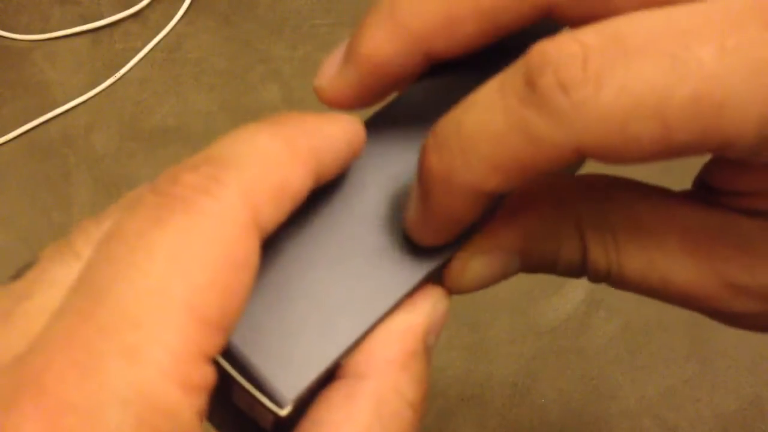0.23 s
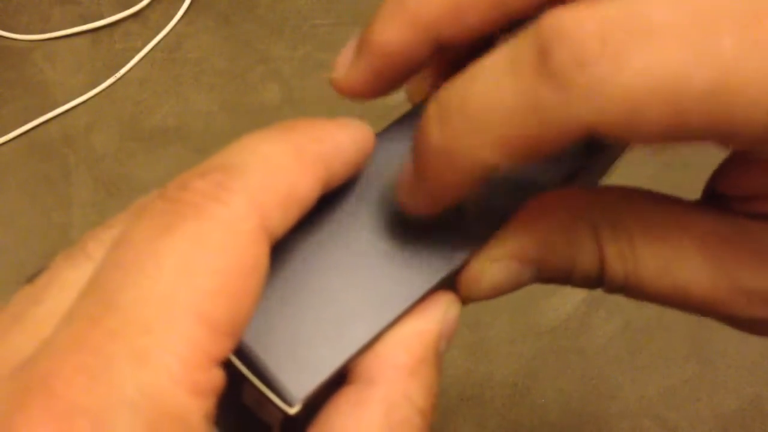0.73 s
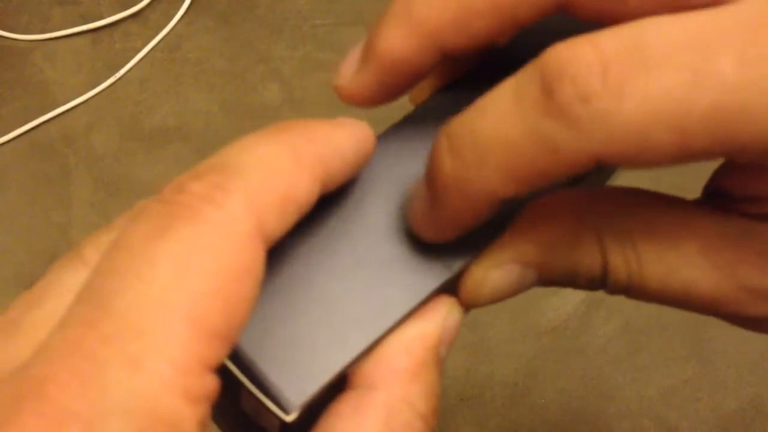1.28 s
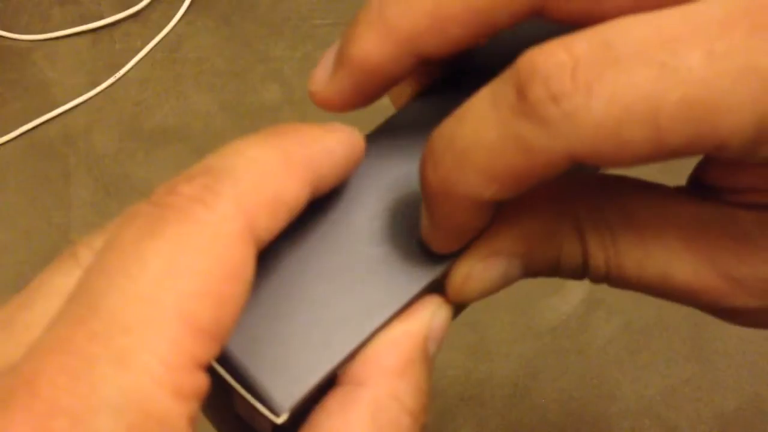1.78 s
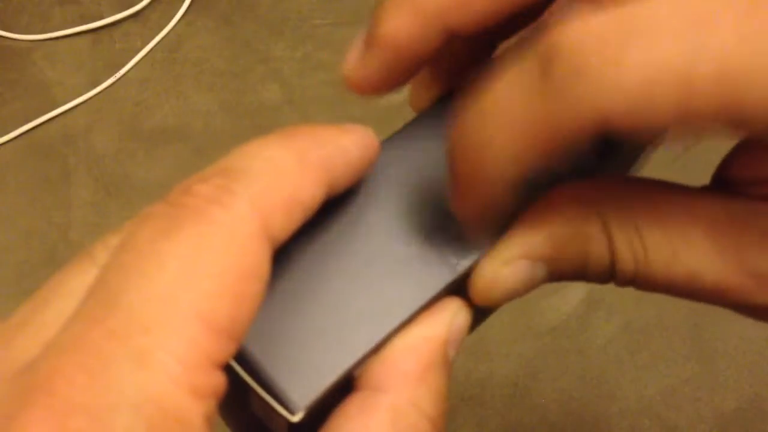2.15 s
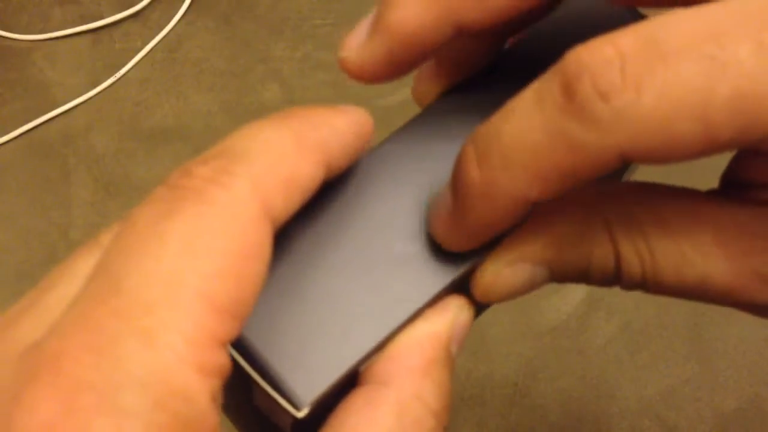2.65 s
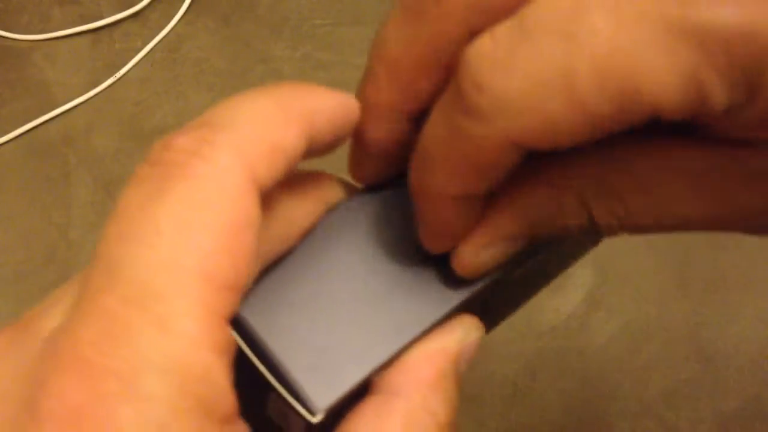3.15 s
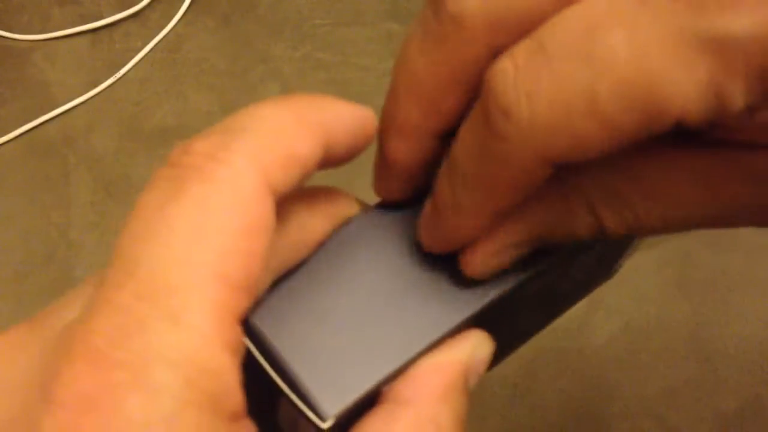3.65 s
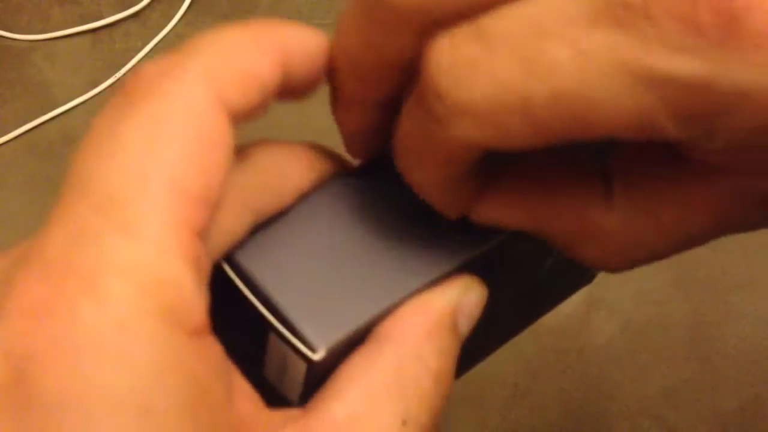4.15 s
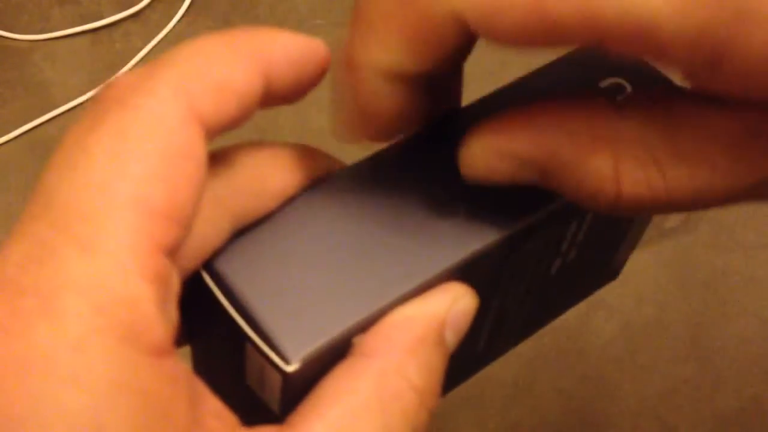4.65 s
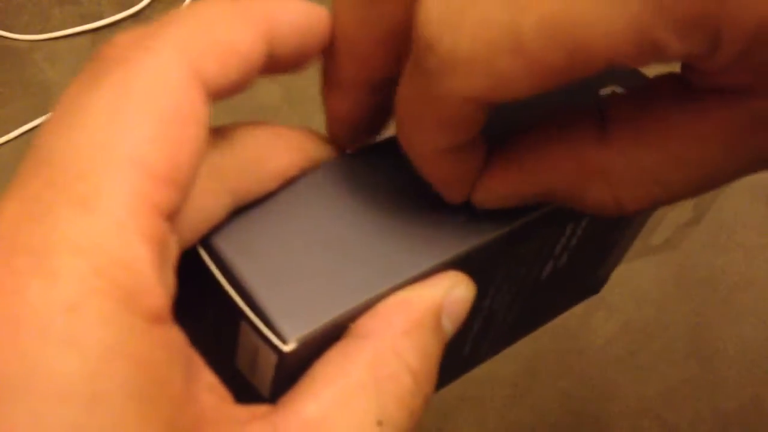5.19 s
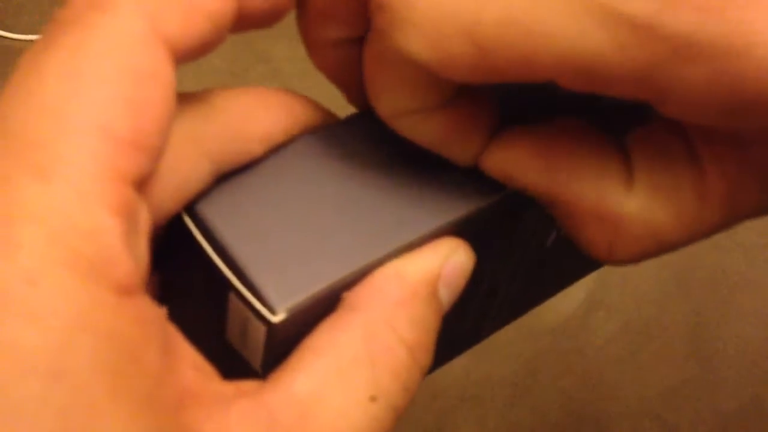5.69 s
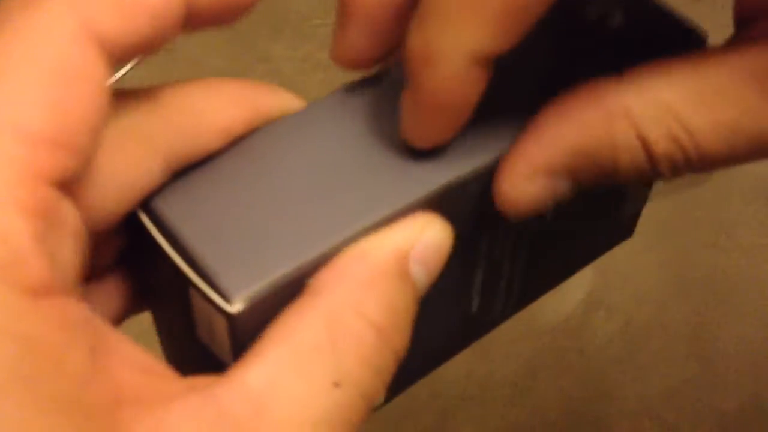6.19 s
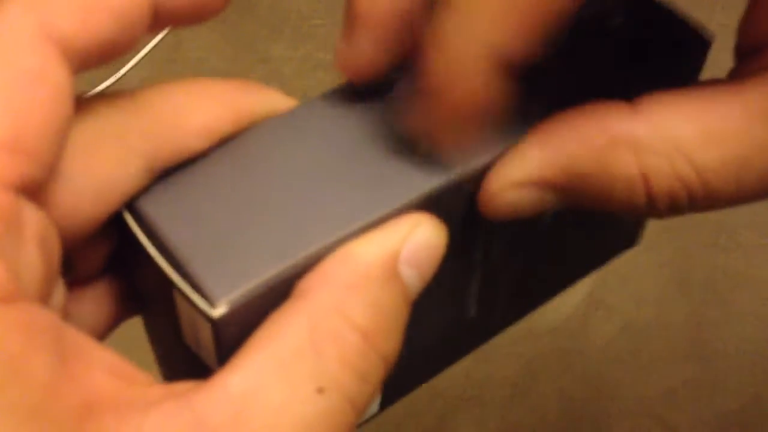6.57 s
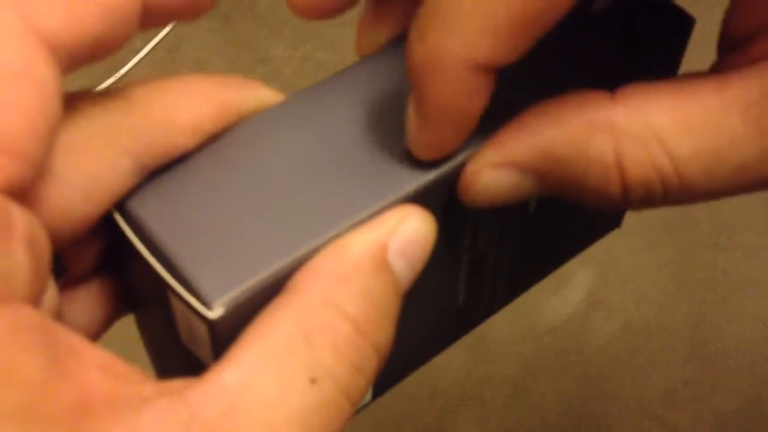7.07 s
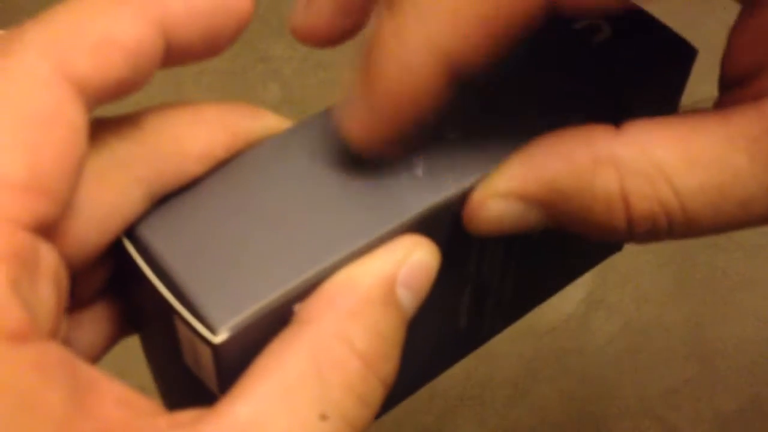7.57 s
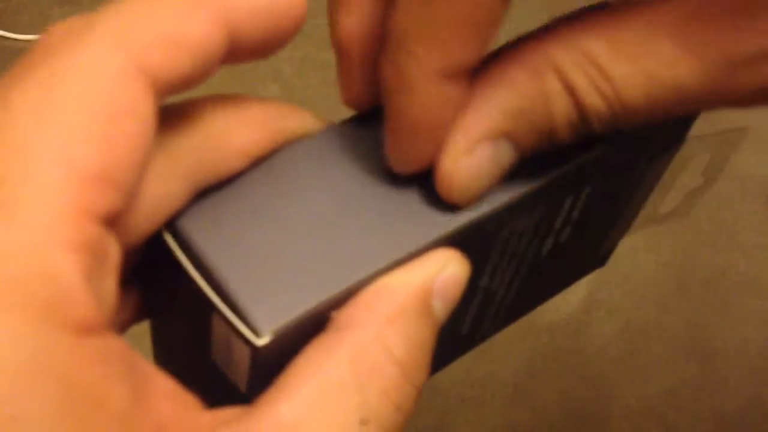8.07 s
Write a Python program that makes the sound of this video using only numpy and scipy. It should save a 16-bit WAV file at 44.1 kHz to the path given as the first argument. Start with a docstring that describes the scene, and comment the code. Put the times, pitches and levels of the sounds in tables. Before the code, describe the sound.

Fingernails pick at the tape on a small cardboard box, close to the microphone in a quiet room. Three sharp, hollow snaps come early as a nail catches and slips off the card, each followed by a tiny swipe. A stretch of faint scratching, ticking and soft fingertip touches follows, then two more snaps near the end. A faint hiss lies underneath.

```python
"""In a quiet room, close by, fingernails pick at the tape on a small cardboard box.
A nail drags over the card by stick-slip friction, catches on the tape edge and slips off: the loaded
panel snaps, the room rings briefly, and the nail swipes back. Between the snaps come faint scratches,
ticks and soft fingertip landings, all filtered by the same resonances of the box.
Beneath them lie the creep of the holding fingers, the murmur of box and room, and a faint hiss."""
import sys
import numpy as np
from scipy import signal
from scipy.fft import rfft, irfft
from scipy.io import wavfile

SR = 44100
rng = np.random.default_rng(int(sys.argv[2]) if len(sys.argv) > 2 else 0)


def store_pcm(level_fs):
    """Save levels as 16-bit WAV."""
    pcm = np.round(np.clip(level_fs, -1, 1) * 32767).astype(np.int16)
    wavfile.write(sys.argv[1], SR, np.atleast_2d(pcm).T)


N = 367794
TAPS = 4096
HZ = np.fft.rfftfreq(TAPS, 1 / SR)

# spectrum of the background noise (frequency [Hz], relative level [dB])
AIR_SPECTRUM = [(18, -69.5), (30, -36.5), (136, -6.5), (177, -1.5), (290, -2.5), (407, -8.5), (452, -7.5),
                (587, -9.5), (939, -11), (1280, -15.5), (1900, -16.5), (2740, -17), (7180, -26),
                (8850, -33.5), (15300, -23.5)]
# envelope of the hiss, which dips briefly (time [s], gain [dB])
HISS_ENVELOPE = [(0, 2.5), (7.27, 1), (7.419, -4), (7.848, -5), (8.34, 1.5)]
# reverberation of the room (frequency [Hz], level [dB], decay time T60 [s])
REVERB_BANDS = [(150,-9,.4), (356.7,-11.5,0.42), (595,-11.5,0.28), (850,-15,.48), (1500,-16.5,0.59),
                (2230,-6,0.45), (2700,-13.5,0.51), (3640,-16.5,.46), (4400,-10,0.31), (5250,-17.5,0.49),
                (7000,-19,.42), (13000,-16,0.27)]
# reflections from the desk, hands and other near surfaces (delay [s], gain [ratio])
NEAR_REFLECTIONS = [(.0012, 0.19), (.0021, -0.044), (.0033, 0.14), (.0072, 0.068), (.0087, -.1),
                    (0.0115, .08)]
# resonances of the box (frequency [Hz], nominal width [Hz], relative level [dB])
BOX_MODES = [(250,120,-12.5), (409,150,-2.5), (839,270,-1), (1012,400,-6), (1362,130,-3), (1595,216,-6.5),
             (2062,210,-14), (2954,540,-12), (3293,390,-7.5), (3757,180,-6), (4373,160,-19), (6093,410,-13),
             (6850,720,-8.5), (8130,1300,-16), (9150,1887,-22.5), (12730,1500,-36.5)]
# soft landings of a fingertip (time [s], relative level [dB])
PAD_LANDINGS = [(2.737, -13.5), (5.437, -8), (6.184, -11), (6.392, 12), (6.46, -2), (7.768, -10)]
# spectrum of a nail's rasp over fibre and tape (frequency [Hz], gain [dB])
RASP_SPECTRUM = [(200, 9.5), (500, -3.5), (850, -4.5), (1500, 0.5), (2000, -0.5), (2500, 8.5), (3200, -1.5),
                 (4050, 3.5), (5200, -5.5), (6500, -3.5), (8200, -2), (9500, -1), (11000, -6),
                 (14000, -1.5)]
# drags of a nail (time of peak speed [s], length [s], relative pressure [dB], nail gain [dB])
NAIL_STROKES = [ (0.05, 0.052, -14.5, -11), (0.887, .075, -21, -6), (.935, 0.024, -24, -1.5),
                (1.001, .06, -21.5, 9), (1.272, .055, -26, -8), (1.332, 0.073, -27, -10),
                (2.435, 0.074, -33.5, 1), (2.738, 0.041, -45, 21.5), (2.881, 0.1, -40.5, 16),
                (3.279, 0.094, -26, 2), (3.309, 0.075, -37, 18.5), (3.444, 0.22, -45.5, 19),
                (3.574, 0.15, -30, 8), (3.772, 0.094, -22, -2), (3.844, .1, -25, -4.5),
                (4.011, .16, -30.5, -1), (4.378, 0.065, -30, -6), (4.79, 0.081, -32, 4),
                (4.917, 0.043, -36, 11.5), (4.969, 0.027, -17.5, -8), (5.018, 0.1, -21.5, -5),
                (5.42, 0.07, -25, -8.5), (6.194, 0.12, -18.5, -9.5), (6.398, 0.045, -20.5, 11.5),
                (6.795, 0.093, -33, 1), (7.66, 0.1, -31.5, -9.5), (7.748, .05, -32, 5.5),
                (8.034, 0.16, -32, 2.5), (8.266, 0.057, -27, -14)]
# nail contacts and clicks of the card (time [s], relative level [dB], flesh gain [dB], nail gain [dB])
NAIL_TICKS = [ (.173, -13.5, 6, -6), (0.4271, -23, 19.5, -6), (.782, -17, 8.5, -10), (.9671, -10, 18.5, -4),
              (1.2269, -13, 10, -1.5), (1.411, -12, 2, -9), (2.3255, -20, 11.5, 1),
              (2.7326, -23.5, 17.5, 8), (3.1, -27.5, -16, 21.5), (4.7293, -9, -5.5, 1),
              (4.889, -21.5, 11, -3), (5.0865, -21, 9, -10), (5.4196, -18, 8.5, -4),
              (6.0217, -2.5, 4.5, -7), (6.449, -15, -2, 5.5), (6.5612, -9.5, 11.5, -4), (6.5796, -5, -6, 5),
              (6.6803, -12.5, 8.5, -5.5), (7.6027, -18, -1, -12)]
# snaps of the panel (time [s], relative level [dB], thump [dB], knock [dB], crack [dB], edge [dB],
# rebound delay [ms], rebound share [ratio], low ring [Hz], high ring [Hz], delay of the swipe back [s])
PANEL_SNAPS = [ (0.5314, 23.7, -1, 4.5, -1.5, -4, 0.28, 0.38, 362, 1600, 0.12),
               (0.9765, 8.9, -1.5, 0.5, -14, -7.5, 0.303, 0.27, 390, 803, .146),
               (1.9951, 20.1, 4.5, 3, -1.5, 1.5, .875, .05, 405.6, 2130, 0.13),
               (6.387, 15.9, 2, 10, -2.5, -6.5, 0.96, 0.14, 470, 1436, .171),
               (7.284, 22.8, -4.5, 4.5, 1.5, -1, 0.95, -0.21, 881, 1400, 0.14)]


def amp(db):
    """Amplitude ratio of a level in decibels."""
    return 10 ** (np.asarray(db) / 20)


def unit(x):
    """Normalisation to an rms of 1."""
    return x / np.sqrt(np.mean(x ** 2) + 1e-20)


def log_interp(points, hz):
    """Interpolation of (frequency, value) points on a logarithmic frequency axis."""
    frequency, value = np.transpose(points)
    return np.interp(np.log(hz + 1), np.log(frequency + 1), value)


def add(mix, start_s, sound):
    """Superposition of a sound on the mix."""
    part = mix[max(round(start_s * SR), 0):][:len(sound)]
    part += sound[:len(part)]


def wander(n, per_s):
    """Random modulation: straight lines join per_s Gaussian values a second."""
    return np.interp(np.arange(n) * per_s / SR, np.arange(4000), rng.standard_normal(4000))


def minimum_phase(gain):
    """Minimum phase gives the most compact causal impulse response with this gain over HZ."""
    log_gain = np.log(np.maximum(np.r_[gain, gain[-2:0:-1]], gain.max() * 1e-5))
    return irfft(np.exp(np.conj(signal.hilbert(log_gain)))[:len(HZ)])


def air(hiss_corner_hz=600):
    """Spectrally shaped noise: the room's steady low murmur and the microphone's hiss."""
    hz = np.fft.rfftfreq(N, 1 / SR)
    noise = unit(irfft(rfft(rng.standard_normal(N)) * amp(log_interp(AIR_SPECTRUM, hz)), N))
    hiss = irfft(rfft(noise) * hz / np.hypot(hz, hiss_corner_hz), N)
    murmur = noise - hiss
    hiss_db = np.interp(np.arange(N) / SR, *np.transpose(HISS_ENVELOPE))
    return amp(-66.5) * (murmur + hiss * amp(hiss_db))


def room(x, onset_s=0.014, build_s=0.018, scatter_db=-13, scatter_s=0.0062, wall_s=0.059, wall_db=3):
    """Reverberation: near reflections and scatter, then a tail in which each band decays at its own rate."""
    hz, t, noise = signal.stft(rng.standard_normal(SR) / np.sqrt(SR), SR, nperseg=256)
    bands, age = np.array(REVERB_BANDS), np.arange(SR) / SR
    level_db = log_interp(bands[:, :2], hz)[:, None]
    decay_rate = np.log(1000) / log_interp(bands[:, ::2], hz)[:, None]
    # the far walls return the lows together
    echo_db = wall_db * np.exp(-((t - wall_s) / 0.0096) ** 2) / (1 + hz[:, None] / 2000)
    tail = noise * amp(level_db + echo_db) * np.sqrt(2 * decay_rate) * np.exp(-decay_rate * t)
    fade_in = np.clip((age - onset_s) / build_s + 0.5, 0, 1)
    response = signal.istft(tail, SR, nperseg=256)[1][:SR] * fade_in
    scatter = rng.standard_normal(SR) * np.exp(-age / scatter_s)  # off the hands
    response += amp(scatter_db) * scatter / np.linalg.norm(scatter)
    response[0] = 1  # direct sound
    for delay_s, gain in NEAR_REFLECTIONS:
        response[round(delay_s * SR)] += gain
    return signal.fftconvolve(x, response)[:N]


def hollow(rest_db=-79, shift_db=-67, band_hz=(140, 215)):
    """Cavity resonance: the hollow of the box murmurs, most while the hands shift it once."""
    murmur = signal.sosfilt(signal.butter(2, band_hz, "band", fs=SR, output="sos"), rng.standard_normal(N))
    shift_s = np.cumsum([3.11, 0.26, 0.79, 0.57])  # start, rise, hold, fall
    level_db = np.interp(np.arange(N) / SR, shift_s, [rest_db, shift_db, shift_db, rest_db])
    return amp(level_db) * unit(murmur)


def box_gain(low_hz=45):
    """Heavily damped panel resonances add in power; so small a box radiates little bass."""
    power = sum(amp(db) ** 2 / (1 + ((HZ ** 2 - hz ** 2) / (width * (HZ + 1))) ** 2) ** 1.5
                for hz, width, db in BOX_MODES)
    return np.sqrt(power) * HZ / np.hypot(HZ, low_hz)


def touch(flesh_db, nail_db):
    """Impulse response of the box to a finger: soft flesh excites the lows, hard nail the highs."""
    tilt_db = log_interp([(500, flesh_db), (2000, 0), (7000, nail_db)], HZ)
    return minimum_phase(box_gain() * amp(tilt_db))


def friction(n, slips_per_s, spread_db, uneven_db):
    """Stick-slip friction: tiny impulses of uneven size, swelling and fading as the pressure wavers."""
    chance, size, sign = rng.random(n), rng.exponential(1, n), rng.choice([-1., 1.], n)
    slips = (chance < slips_per_s / SR) * sign * amp(spread_db * np.minimum(size, 4))
    return unit(slips * amp(uneven_db * wander(n, per_s=160)))


def grip(level_db=-71, waver_db=2):
    """Frictional creep: the skin of the holding fingers slips softly on the card."""
    slips = friction(N, slips_per_s=4000, spread_db=2.5, uneven_db=1.5)
    creep = signal.fftconvolve(slips, touch(flesh_db=-3.5, nail_db=-2.5))[:N]
    return amp(level_db + waver_db * wander(N, per_s=3)) * unit(creep)


def pads(soft_hz=380, settle_s=0.008):
    """Soft impact: flesh settles over several milliseconds, so it excites only the low resonances."""
    out, t = np.zeros(N), np.arange(SR // 20) / SR
    dull_box = minimum_phase(box_gain() / (1 + (HZ / soft_hz) ** 3))
    for time_s, db in PAD_LANDINGS:
        press = rng.standard_normal(len(t)) * np.exp(-t / settle_s)
        add(out, time_s, amp(db) * signal.fftconvolve(press / np.linalg.norm(press), dull_box))
    return amp(8.5) * out


def stroke(fastest_s, length_s, pressure_db, nail_db, rise_share=0.44, hiss_db=4, hiss_octaves=0.23):
    """Friction noise swells and fades with sliding speed. Returns the start time and the sound."""
    t, rise_s = np.arange(SR // 2) / SR, length_s * rise_share
    envelope = np.interp(t, [0, rise_s, length_s], [0, 1, 0]) ** 0.77
    drive = envelope * friction(len(t), slips_per_s=9500, spread_db=1.5, uneven_db=2.5) / np.sqrt(SR / 1000)
    hiss_hz = 6770 + 70 * max(nail_db, 0)  # higher as the nail stands on its edge
    peak_db = hiss_db * np.exp(-(np.log2((HZ + 1) / hiss_hz) / hiss_octaves) ** 2)
    rasp = signal.fftconvolve(drive, minimum_phase(amp(log_interp(RASP_SPECTRUM, HZ) + peak_db)))
    flesh_db = -2 - 0.55 * (pressure_db + 32.5)  # the lighter the stroke, the more flesh
    return fastest_s - rise_s, amp(pressure_db) * signal.fftconvolve(rasp, touch(flesh_db, nail_db))


def scratches():
    """Sliding friction: the searching strokes, and a short, bright swipe back after every snap."""
    out = np.zeros(N)
    for row in NAIL_STROKES:
        add(out, *stroke(*row))
    for time_s, snap_db, *_, swipe_delay_s in PANEL_SNAPS:
        pressure_db = -20.5 - 0.42 * snap_db  # after a harder snap the finger flies further, lands lighter
        add(out, *stroke(time_s + swipe_delay_s, length_s=0.044, pressure_db=pressure_db, nail_db=11))
    return amp(2.5) * out


def crunch(fibres_db, decay_s):
    """Impulsive excitation: one blow, then a burst of yielding fibres that roughens the treble."""
    t = np.arange(SR // 100) / SR
    burst = rng.standard_normal(len(t)) * np.exp(-t / decay_s)
    fibres = signal.sosfilt(signal.butter(2, 1900, "high", fs=SR, output="sos"), burst)
    return (t == 0) + amp(fibres_db) * fibres / np.linalg.norm(fibres)


def disperse(x):
    """Dispersion: bending waves cross the card faster at high frequency, so the lows arrive late."""
    for corner_hz in (1100, 2200, 3500, 5000):
        pole = np.exp(-2 * np.pi * corner_hz / SR)
        x = signal.lfilter([-pole, 1], [1, -pole], x)  # all-pass
    return x


def tick(db, flesh_db, nail_db):
    """A light impact excites the resonances of the box and disperses through the card."""
    return amp(db) * disperse(np.convolve(touch(flesh_db, nail_db), crunch(fibres_db=3.5, decay_s=0.0022)))


def ticks(faint_count=10):
    """Contact transients: the clear ticks, and fainter ones at random moments."""
    out = np.zeros(N)
    for time_s, *contact in NAIL_TICKS:
        add(out, time_s, tick(*contact))
    faint_times = rng.random(faint_count) * N / SR
    for time_s, (size, angle) in zip(faint_times, rng.standard_normal((faint_count, 2))):
        add(out, time_s, tick(db=-27 + 2.5 * size, flesh_db=4, nail_db=-2 + 4 * angle))
    return amp(-5) * out


def ring(hz, t60_s, spread=0.06, count=7):
    """Damped free vibration: a cluster of close panel modes, of energy 1, builds up and dies away."""
    t = np.arange(TAPS * 2) / SR
    mode_hz = hz * (1 + spread * (np.linspace(-2, 2, count) + rng.uniform(-0.12, 0.23, count)))
    modes = np.sin(2 * np.pi * (mode_hz[:, None] * t + rng.random((count, 1)))).sum(0)
    sound = modes * (1 - np.exp(-t * hz)) * amp(-60 * t / t60_s)
    return sound / np.linalg.norm(sound)


def snaps(ring_per_thump=1.7):
    """Elastic release: the loaded panel lets go, rebounds at once and rings at pitches set by the grip."""
    out = np.zeros(N)
    for time_s, db, thump, knock, crack, edge, rebound_ms, share, low_hz, high_hz, _ in PANEL_SNAPS:
        tone_db = log_interp([(350, thump), (900, 0), (1800, knock), (3400, crack), (7000, edge)], HZ)
        rebound = abs(1 + share * np.exp(-2j * np.pi * HZ * rebound_ms / 1000))  # comb filter
        panel = minimum_phase(box_gain() * rebound * amp(db + tone_db))
        blow = np.convolve(panel, crunch(fibres_db=-4, decay_s=0.0012))
        rings = amp(-20) * ring(low_hz, t60_s=0.11) + amp(-27) * ring(high_hz, t60_s=0.17)
        add(out, time_s, disperse(blow))
        add(out, time_s, np.linalg.norm(blow) * amp(ring_per_thump * thump) * rings)
    return amp(-0.23) * out


def scene():
    """Superposition in one channel: the picking reverberates in the room over the faint background."""
    picking = snaps() + ticks() + pads() + scratches()
    return (room(picking) + grip() + hollow() + air())[None]


def record(dry, ceiling=0.95, cutoff_hz=15450):
    """Clipping caps the peaks of the sharpest snaps; a low-pass filter then limits the bandwidth."""
    low_pass = signal.firwin(511, cutoff_hz, window=("kaiser", 9), fs=SR)
    return signal.oaconvolve(np.clip(dry, -ceiling, ceiling), low_pass[None], "same")


dry = scene()
out = record(dry)
store_pcm(out)
```